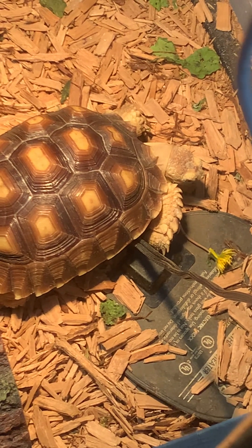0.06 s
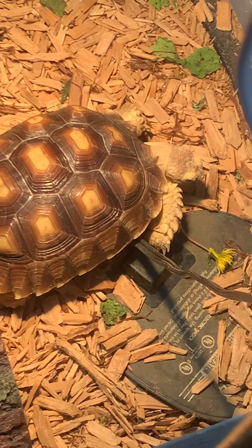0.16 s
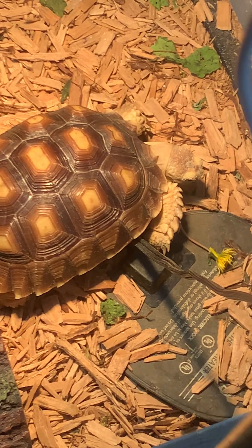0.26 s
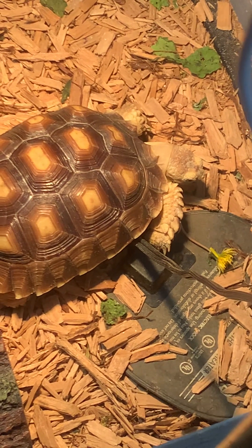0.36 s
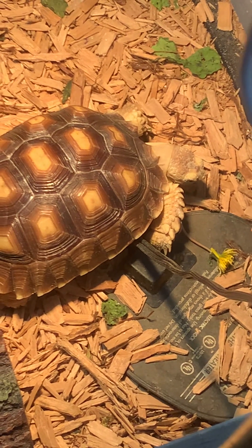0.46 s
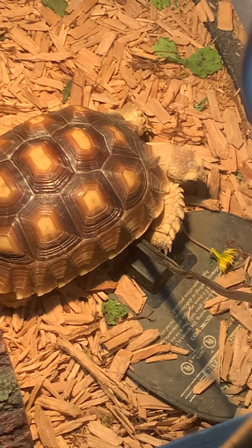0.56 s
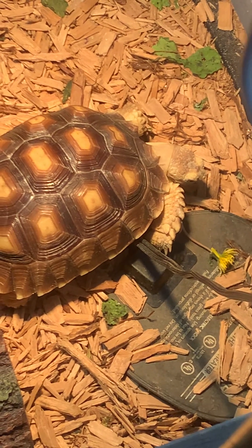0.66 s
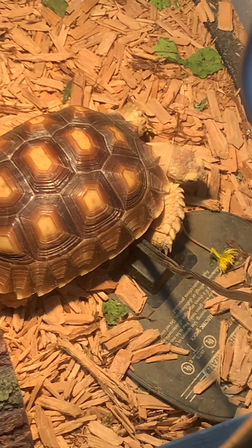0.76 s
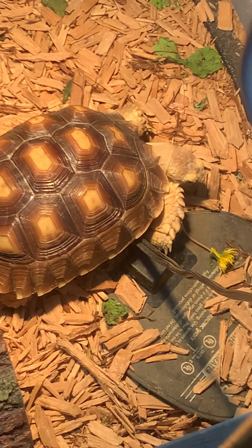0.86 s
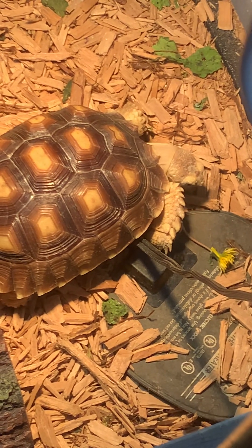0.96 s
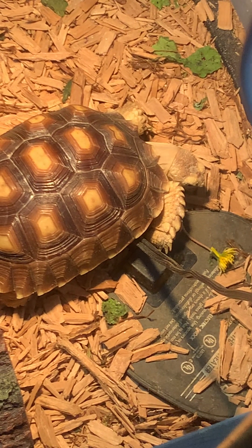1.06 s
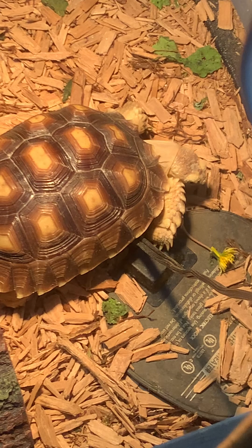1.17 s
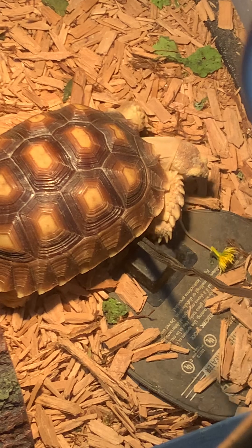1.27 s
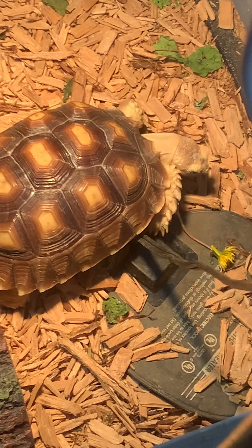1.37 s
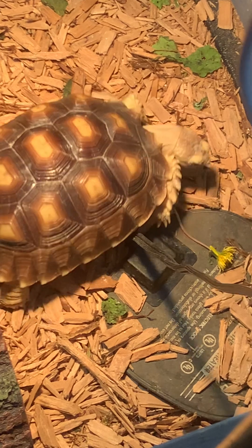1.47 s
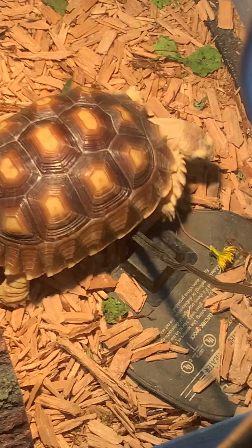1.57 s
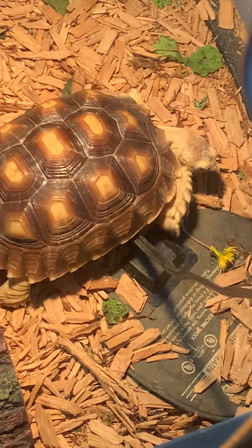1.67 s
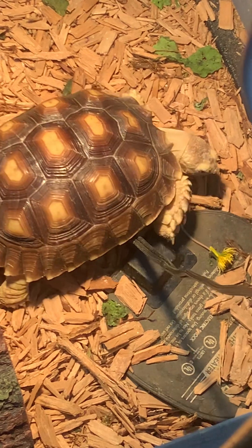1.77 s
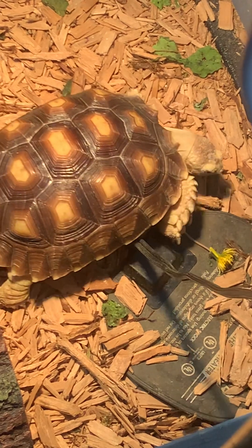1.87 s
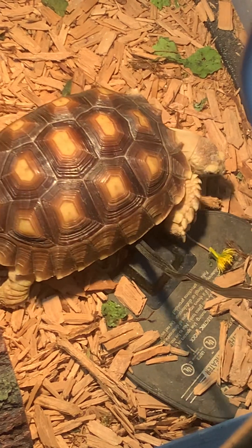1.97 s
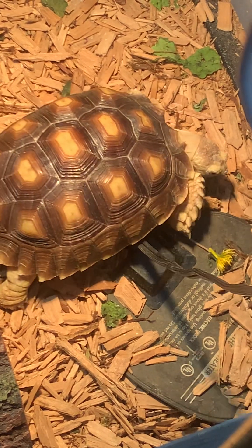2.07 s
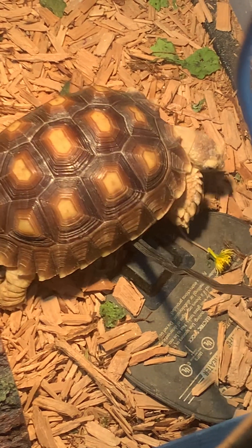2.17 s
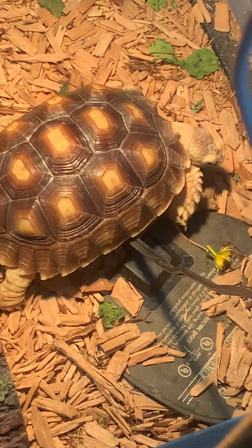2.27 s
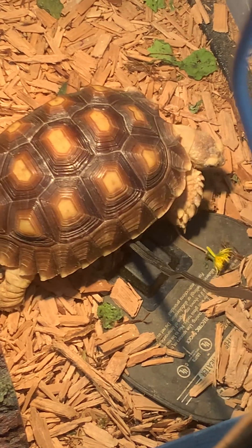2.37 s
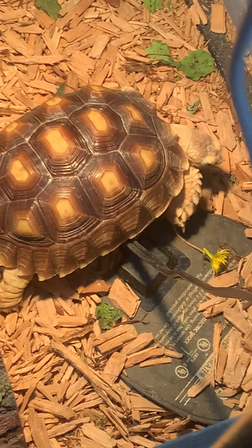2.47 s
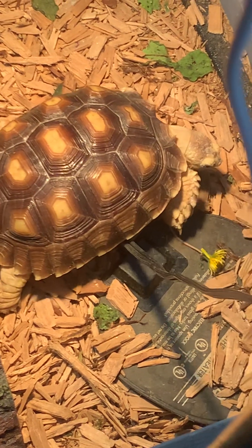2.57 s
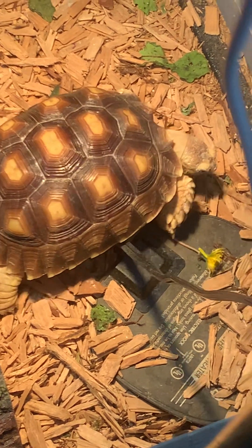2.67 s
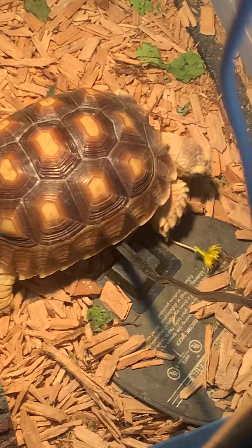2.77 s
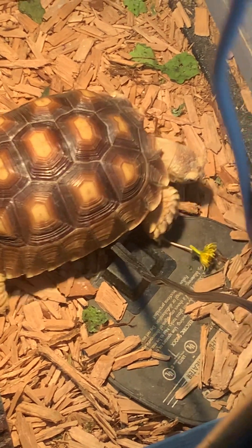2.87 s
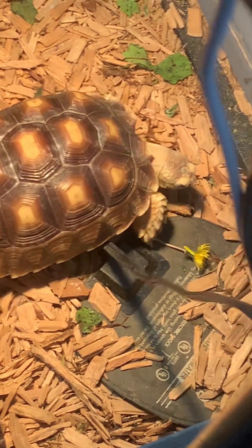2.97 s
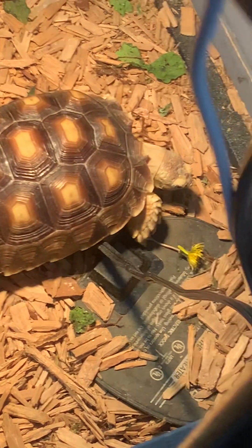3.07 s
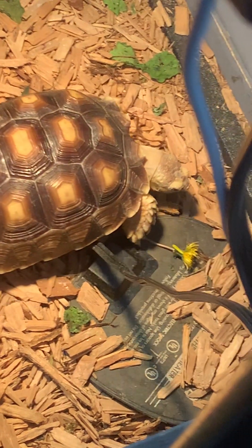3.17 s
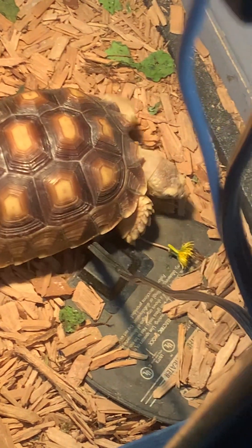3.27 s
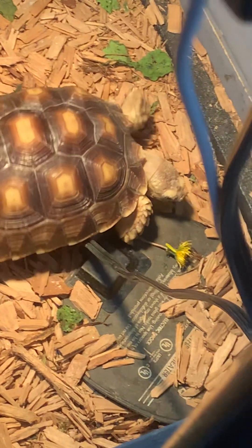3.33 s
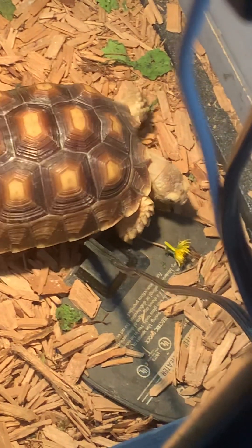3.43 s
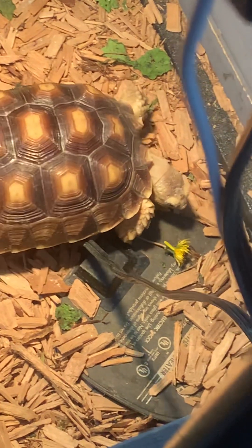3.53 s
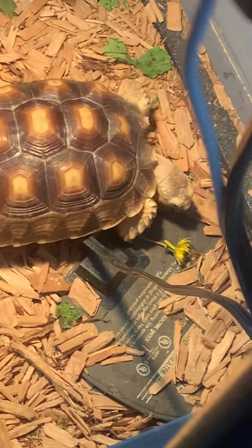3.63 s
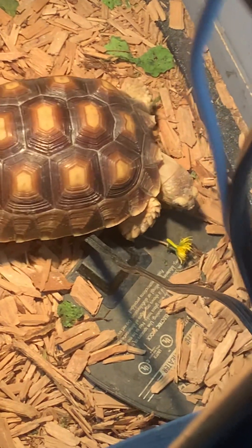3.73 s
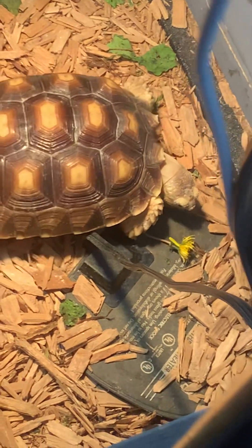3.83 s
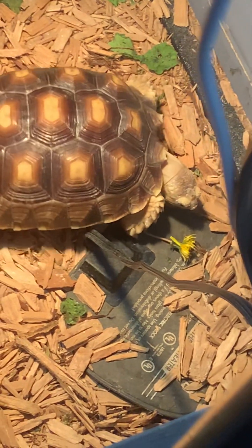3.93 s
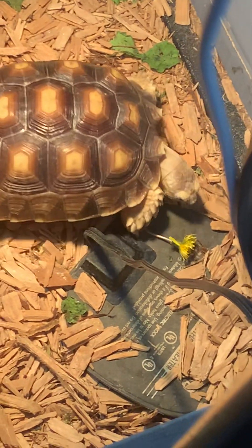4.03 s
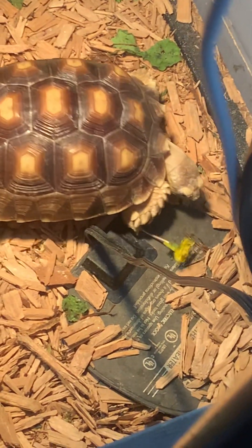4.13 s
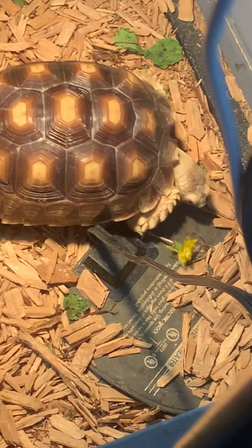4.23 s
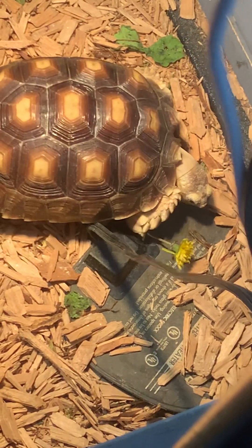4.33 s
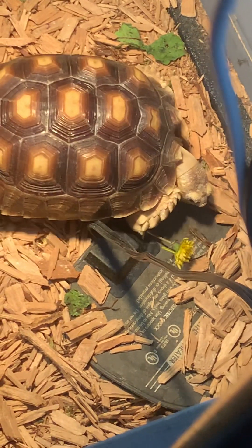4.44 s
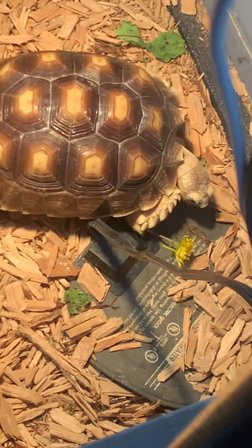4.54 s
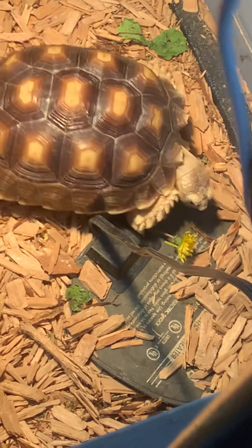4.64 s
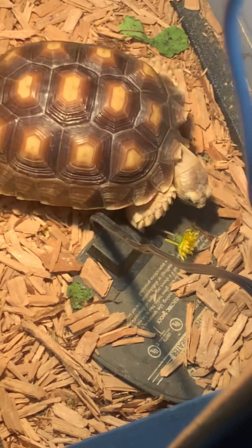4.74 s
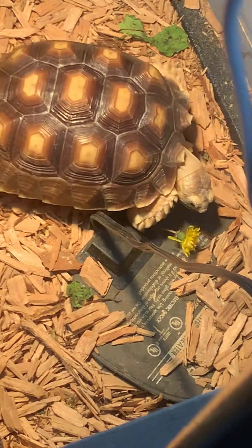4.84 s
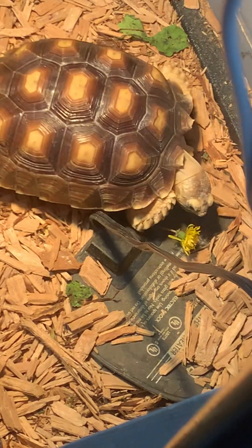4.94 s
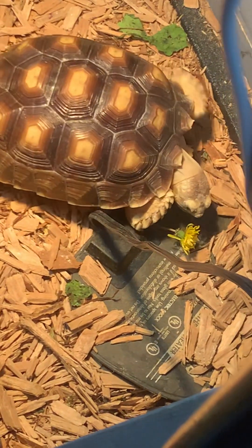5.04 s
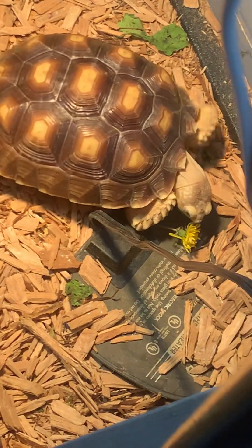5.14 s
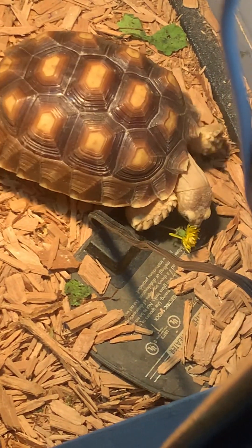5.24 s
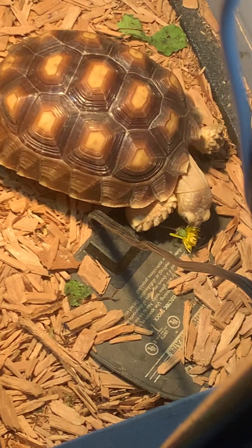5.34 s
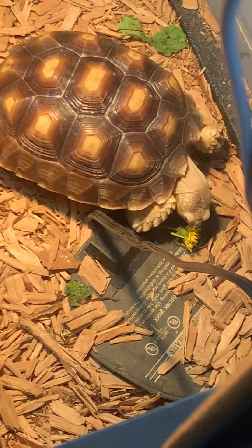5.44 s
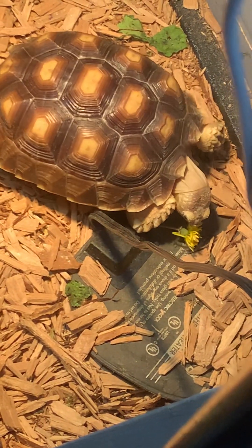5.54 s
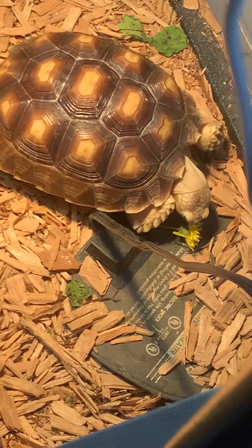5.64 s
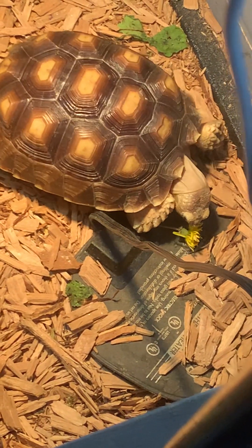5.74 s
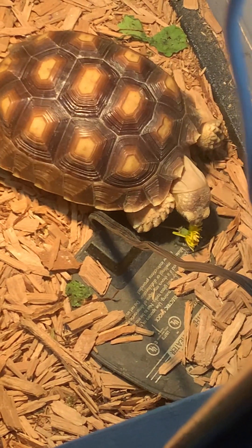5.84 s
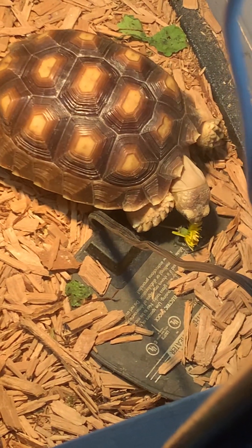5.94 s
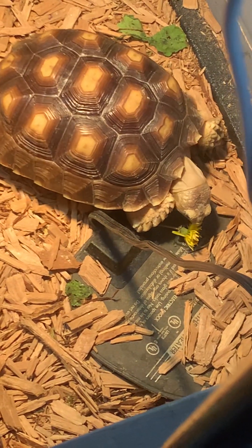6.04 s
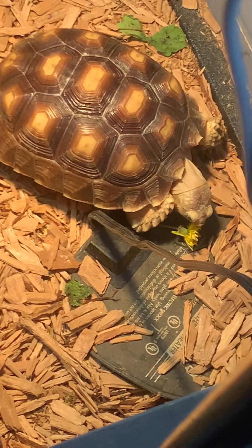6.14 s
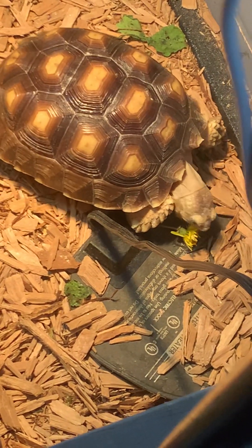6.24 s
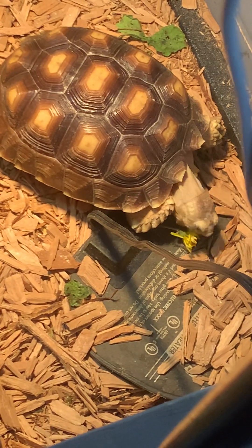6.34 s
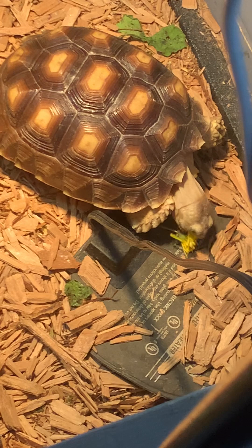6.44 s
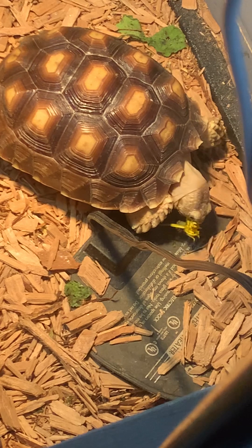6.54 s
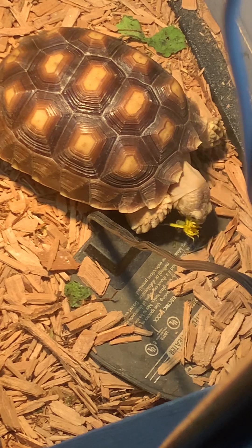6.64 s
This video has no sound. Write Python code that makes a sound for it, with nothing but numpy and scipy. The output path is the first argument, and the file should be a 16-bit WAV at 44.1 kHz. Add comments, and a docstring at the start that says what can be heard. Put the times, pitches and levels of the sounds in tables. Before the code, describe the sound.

A small tortoise shuffles over wood chips with rustles, crunches, sharp snaps and dull bumps, over a steady low indoor hum.

```python
"""A low mains hum and room rumble come first; then a tortoise is heard shuffling over wood chips.
It is indoors in a plastic pen, close to a phone's microphone, and nips a flower.
Dragged chips rustle in tiny noise bursts and crunch under its weight; chips and stalk snap with a
crack and a woody knock. Shell and feet bump the pen floor, which rings low and briefly."""
import sys
import numpy as np
from scipy import signal
from scipy.fft import rfft, irfft, next_fast_len
from scipy.io import wavfile
from scipy.ndimage import uniform_filter1d

SR = 44100
rng = np.random.default_rng(int(sys.argv[2]) if len(sys.argv) > 2 else 0)


def waveform_to_disk(signal):
    """Save audio, clipped to [-1, 1], as 16-bit WAV at the path in sys.argv[1]."""
    frames = np.transpose(np.atleast_2d(signal))
    scaled = np.clip(frames, -1, 1) * 32767
    samples = np.round(scaled).astype(np.int16)
    wavfile.write(sys.argv[1], SR, samples)


N = 295496

# The chip bed from close by: four ranges, and the woody one again under a heavy foot.
# Each row: frequency in Hz, relative level in dB.
WOODY_SPECTRUM = [(400, -33), (620, -19), (710, 4.5), (850, -2.5), (970, 0), (1250, -1), (1600, 0.5),
                  (2200, -4), (3200, -38.5), (5000, -69)]
FIZZ_SPECTRUM = [(1500, -14), (2800, 1.5), (3500, 0), (4500, -0.5), (7000, -2.5), (8800, -6.5),
                 (11000, -47)]
DUST_SPECTRUM = [(7000, -36), (9000, -14.5), (11500, 6), (13000, 3.5), (15000, -16), (16500, -12)]
HOLLOW_SPECTRUM = [(150, -55), (280, -10), (460, 2), (540, -5), (800, -40)]
CRUSH_SPECTRUM = [(350, -23), (600, 1), (850, 8), (1100, 1), (1600, 7), (2200, -5), (3000, -9), (4200, -29),
                  (6000, -36)]
# How the woody, fizzy, dusty and hollow ranges follow the drag.
# Each row: level in dB at a usual drag, share of the drag's change, share of its brightness.
DRAG_RESPONSE = [(-77, 0.96, 0.0), (-83.5, 0.72, .9), (-87.5, .3, .5), (-74, 1.1, -.3)]
def rustle():
    """Chips slip under the tortoise, near the phone; crushing is coarser and fuller than dragging."""
    level, bright = drag_db()
    woody, fizzy, dusty, hollow = [gain_of(db + a * level + b * bright) for db, a, b in DRAG_RESPONSE]
    weight, gritty, thud = crunches()
    coarse = patchy(slips(per_s=1100, spread_db=1.0, t60=0.086), depth_db=3.5)
    fine = patchy(slips(per_s=2000, spread_db=3.7, t60=0.077), depth_db=4.9)
    lumps = patchy(slips(per_s=400, spread_db=2.5, t60=0.03), depth_db=3.3)
    return (woody * coloured(coarse, WOODY_SPECTRUM)
            + weight * coloured(lumps, CRUSH_SPECTRUM)
            + np.hypot(fizzy, gritty) * coloured(fine, FIZZ_SPECTRUM)  # drag and crush add in power
            + np.hypot(dusty, gritty * gain_of(-3.5)) * coloured(fine, DUST_SPECTRUM)
            + np.hypot(hollow, thud) * coloured(coarse, HOLLOW_SPECTRUM))


def slips(per_s, spread_db, t60):
    """Noise in tiny bursts of uneven size, as chips slip past each other."""
    sizes = gain_of(spread_db * np.minimum(rng.exponential(1, N), 5))
    onsets = rng.random(N) < per_s / SR
    decay = gain_of(-60 * np.arange(2000) / SR / t60)
    return signal.oaconvolve(sizes * onsets, decay)[:N] * rng.standard_normal((2, N))


# Legs and shell dragging through the pen. Each row: time in seconds, drag in dB, brightness in dB.
DRAG_PATH = [(0.0, -82.5, -4), (0.39, -87, 3.5), (1.1, -79.5, -2), (1.25, -76, 3), (1.4, -72, 1.5),
             (1.96, -79.5, -1), (2.13, -71, 0), (2.24, -74.5, 4), (2.54, -74, 1), (3.15, -76, 0.5),
             (3.3, -81, 0), (3.45, -79, -2.5), (3.73, -76, 5), (3.9, -71.5, 1.5), (3.96, -75, 7.5),
             (4.09, -78, 0), (4.27, -80, 3), (4.66, -74.5, -2.5), (4.81, -70, 0), (5.19, -72.5, 1),
             (5.34, -79.5, -2), (5.5, -77.5, 0.5), (6.38, -75.5, 3.5), (6.7, -78.5, 1)]
def drag_db(usual_db=-76):
    """Drag level above the usual, and brightness, at every sample."""
    times, level, bright = np.transpose(DRAG_PATH)
    t = np.arange(N) / SR
    return np.interp(t, times, level) - usual_db, np.interp(t, times, bright)


# A foot or the shell crushing into the bedding. Each row: start in seconds, length of the press
# in seconds, then weight, grit and hollow thud in dB.
PRESSES = [(0.643, 0.071, -73.5, -72.5, -97), (1.234, 0.094, -65, -74, -80),
           (1.279, 0.081, -63.5, -84, -58), (1.458, 0.11, -70, -67.5, -82), (1.781, 0.089, -72, -83, -81),
           (2.095, 0.04, -56.5, -69, -50), (2.331, 0.032, -63, -73, -49), (2.452, 0.095, -75, -65.5, -55.5),
           (2.557, 0.16, -68, -71.5, -67), (2.85, 0.052, -65, -65.5, -55), (3.135, 0.15, -90, -74.5, -75),
           (3.297, 0.05, -75, -76, -60.5), (3.337, 0.12, -65, -72.5, -69),
           (3.829, 0.045, -68.5, -77.5, -67), (3.918, 0.14, -66.5, -79, -57.5), (3.976, 0.1, -70, -72, -67),
           (4.289, 0.068, -76, -71.5, -72), (4.617, 0.071, -64.5, -59.5, -55),
           (4.754, 0.044, -82, -72, -56.5), (4.83, 0.058, -70, -64, -59), (5.018, 0.063, -56, -63, -64),
           (5.206, 0.067, -67, -67, -81), (5.259, 0.068, -66, -76, -66), (5.716, 0.047, -73, -79, -82),
           (5.77, 0.11, -75.5, -75.5, -92), (6.096, 0.12, -70, -76, -82), (6.23, 0.042, -88, -83, -71)]
def crunches():
    """Envelopes of weight, grit and thud in each crush: quick rise, sagging hold, softer let-go."""
    out = np.zeros((3, N))
    for start, length, *levels_db in PRESSES:
        progress = np.arange(round(1.6 * length * SR)) / (length * SR)  # the sound outlasts the press
        fall_db = -4 * progress - 29 * np.maximum(progress - .75, 0)
        press = np.minimum(progress / 0.25, 1) * gain_of(fall_db)
        add(out, start, gain_of(levels_db)[:, None] * press)
    return out


# Chips and stalk snapping at close range. Each row: start in seconds, knock level in dB, knock pitch
# in Hz, crack level in dB, crack brightness (positive gives a high hissy tick, negative a duller
# mid crack), factor on the knock's decay time.
SNAP_EVENTS = [(1.229, -46, 860, -53, 5, 1.6), (1.248, -39, 1000, -45, 5.5, 1.2),
               (1.297, -44.5, 853, -48, 5, 3.4), (1.3, -47, 725, -48, -31, 2.4),
               (1.319, -45, 750, -38, 5, 2.4), (1.382, -50.5, 896, -66, -14, 2),
               (1.436, -66, 800, -67, 12, 1.1), (1.481, -52.5, 1093, -59, -34, 4.2),
               (1.51, -52, 1000, -56, -2, 1.5), (2.092, -29, 970, -56, 3, 1.01),
               (2.334, -46.5, 930, -53, 7, 2.3), (2.431, -68, 830, -56, 5, 1), (2.467, -48, 820, -72, 9, 6),
               (2.488, -46.5, 710, -50.5, 3, 4), (2.555, -72, 1110, -56.5, 4, 0.91),
               (2.861, -54.5, 1430, -58, -9, 2.2), (2.972, -43, 1110, -94, 4, 0.62),
               (3.305, -56.5, 1380, -55.5, 1, 1.3), (3.38, -42.5, 1420, -73, 2, 0.8),
               (3.439, -57, 1060, -86, -2, 1.5), (3.826, -63, 710, -61, -12, 1.1),
               (3.918, -54, 1500, -85, 0.0, 1.5), (3.939, -42, 1400, -79, 4, 0.68),
               (3.966, -42, 1370, -54, 1, 1.3), (3.993, -53.5, 840, -56, -2, 6.6),
               (4.108, -52.5, 1350, -65, 2, 0.94), (4.244, -55, 710, -65, -22, 1.5),
               (4.297, -62, 1290, -59, -22, 4), (4.611, -46, 1240, -57, 3, 2.4),
               (4.634, -47.5, 1098, -56, -16, 5.8), (4.745, -51, 745, -60, 2, 2.6),
               (4.765, -43, 890, -54, -28, 2.4), (4.83, -53, 900, -51.5, -1.5, 5.8),
               (4.973, -51, 846, -62, -20, 1.8), (5.013, -50, 776, -85, 0.0, 2.7),
               (5.029, -37, 886, -53, 7, 3.3), (5.098, -48, 650, -79, -5, 1.5),
               (5.24, -50, 1325, -52.5, 1, 2.1), (5.274, -46.5, 987, -56, 1, 2.8),
               (5.333, -48, 714, -86, 0.0, 2.8), (5.719, -47.5, 975, -55.5, 4, 0.67),
               (5.9, -61, 1400, -61, -1, 1.1), (5.944, -54.5, 1520, -58.5, 1.5, 1.1),
               (6.018, -57, 730, -62, 7, 1.5), (6.116, -58, 1030, -60, -1, 1.6),
               (6.171, -71, 870, -60.5, -3, 0.99), (6.229, -72, 1080, -53, 5.5, 0.91),
               (6.492, -55.5, 1450, -61, -1, 1.1), (6.536, -74, 710, -60, -1, 1.1)]
# A chip's modes. Each row: multiple of the knock pitch, relative level in dB, base t60 in seconds.
CHIP_MODES = [(1., -7, .024), (.62, -16, .025), (1.45, -14, .016), (2.3, -21, .012)]
# The rough part of the knock. Each row: multiple of the knock pitch, relative level in dB.
SPLINTER_SPECTRUM = [(.3, -30), (.7, -4), (1.1, 0), (1.7, -5), (3.2, -16), (7, -40)]
def snaps(crack_t60=0.018, splinter_t60=0.023, scatter_t60=0.22):
    """A noisy crack and a short rough knock of the chip, with faint scatter from the pen walls."""
    out, t = np.zeros((2, N)), np.arange(4096) / SR
    attack = np.minimum(t / 0.0019, 1)
    for start, knock_db, hz, crack_db, bright, stretch in SNAP_EVENTS + ticks():
        detunes, phases = rng.uniform(0.92, 1.04, (4, 1)), rng.random((4, 2, 1))
        noise = rng.standard_normal((2, len(t)))
        knock = sum(gain_of(db - 60 * t / (t60 * stretch)) * sine(hz * ratio * detune * t + phase)
                    for (ratio, db, t60), detune, phase in zip(CHIP_MODES, detunes, phases))
        splinter = coloured(noise, [(ratio * hz, db) for ratio, db in SPLINTER_SPECTRUM])
        knock += gain_of(-12 - 60 * t / (splinter_t60 * stretch)) * splinter
        crack_spectrum = [(1200, -33), (2500, -2 * bright), (10000, 3), (13500, 2.7 * bright),
                          (15000, -1), (17000, -20)]
        scatter = gain_of(-27 - 60 * t / scatter_t60)
        crack = coloured(noise, crack_spectrum) * (gain_of(-60 * t / crack_t60) + scatter)
        add(out, start, (gain_of(knock_db) * knock + gain_of(crack_db) * crack) * attack)
    return out


def ticks(count=30, usual_db=-62, spread_db=5, low_hz=690, high_hz=1550):
    """Snap rows for chips tipping over faintly at random moments, louder where the drag is strong."""
    when, size, pitch = rng.random((count, 3)).T
    drag = drag_db()[0][(when * N).astype(int)]
    levels = usual_db + drag + spread_db * (2 * size - 1)
    pitches = low_hz * (high_hz / low_hz) ** pitch
    return [(start, db, hz, db - 19, 0, 1.5) for start, db, hz in zip(when * N / SR, levels, pitches)]


# Shell and feet bumping the pen floor, near the phone. Each row: start in seconds, level in dB,
# strongest frequency in Hz, factor on the decay time.
FLOOR_BLOWS = [(1.297, -34, 160, 0.45), (1.32, -36, 127, 0.98), (2.097, -27.5, 192, 0.55),
               (2.333, -37.5, 192, 0.51), (2.465, -46, 209, 2.3), (2.49, -50, 405, 0.63),
               (2.86, -42, 142, 0.83), (3.965, -37, 136, 1.07), (4.001, -37.5, 350, 0.53),
               (4.619, -45, 189, 1.9), (4.649, -49, 400, 1), (4.767, -34, 213, 0.68),
               (5.032, -38, 253, 0.7), (5.05, -38, 270, 0.51), (5.279, -36.5, 258, 0.43)]
# The plastic floor's modes. Each row: frequency in Hz, base t60 in seconds.
FLOOR_MODES = [(125, 0.22), (150, 0.11), (185, 0.14), (215, 0.084), (260, 0.19), (310, 0.064), (370, 0.091),
               (460, 0.17)]
def bumps(spread_octaves=0.57):
    """The place of the blow decides which modes of the plastic floor answer."""
    out, t = np.zeros((2, N)), np.arange(8192) / SR
    attack = 1 - np.exp(-t / 0.0033)
    for start, db, centre_hz, stretch in FLOOR_BLOWS:
        phases = rng.uniform(-0.16, 0.3, (len(FLOOR_MODES), 2, 1))
        ring = 0
        for (hz, t60), phase in zip(FLOOR_MODES, phases):
            mode_db = -6 * (np.log2(hz / centre_hz) / spread_octaves) ** 2
            ring += gain_of(mode_db - 60 * t / (t60 * stretch)) * sine(hz * t + phase)
        add(out, start, gain_of(db) * ring * attack)
    return out


# Thin scrapes in the pen. Each row: start and length in seconds, pitch and width in Hz, level in dB.
THIN_SCRAPES = [(0.656, 0.2, 4610, 1000, -72.5), (1.797, 0.048, 6800, 500, -74),
                (2.16, 0.084, 6170, 450, -73), (2.345, 0.025, 7340, 550, -64.5),
                (4.337, 0.17, 1790, 340, -74.5), (4.461, .04, 6460, 600, -76.5),
                (6.054, 0.2, 3660, 1100, -72.5), (6.332, 0.12, 1546, 300, -70),
                (6.484, 0.11, 8840, 1000, -73.5)]
def squeaks():
    """Each scrape is a narrow noise that starts quickly and fades."""
    out = np.zeros((2, N))
    for start, length, hz, width, db in THIN_SCRAPES:
        progress = np.arange(round(length * SR)) / (length * SR)
        envelope = np.minimum(progress / 0.068, 1) * (1 - progress)
        add(out, start, gain_of(db) * narrow_noise(hz, width, len(progress)) * envelope)
    return out


MAINS_STEADY = .9  # steady share of the power in most hum lines
# Low drones in the room around the pen: the room's own resonances at 58 and 77 Hz, mains and a fan above. #
# Each row: frequency in Hz, rms level in dB, width of the wavering in Hz, steady share from 0 to 1.
HUM_LINES = [(58.3, -51, 4.9, MAINS_STEADY), (77.34, -52, 6.8, 0.98), (120.66, -48.5, 13.8, MAINS_STEADY),
             (239, -57.5, 3.5, MAINS_STEADY), (256.3, -69, 1.2, MAINS_STEADY), (305, -68.5, 3, 0.49)]
def hum():
    """Room resonances, mains and fan drone in lines that are part steady tone, part wavering band."""
    out, t = np.zeros((2, N)), np.arange(N) / SR
    for hz, db, width, steady in HUM_LINES:
        tone = np.sqrt(2) * sine(hz * t + rng.random((2, 1)))
        waver = narrow_noise(hz, width, N)
        out += gain_of(db) * (np.sqrt(steady) * tone + np.sqrt(1 - steady) * waver)
    return out


# Room tone where the phone stands. Each row: frequency in Hz, relative level in dB.
ROOM_SPECTRUM = [(18, -24.5), (40, -4), (60, -1), (140, -6.5), (200, -15.5), (320, -12.5), (400, -32.5),
                 (620, -41), (1000, -50.5), (1700, -47), (2500, -56.5), (5000, -53.5), (13000, -61),
                 (14500, -47.5), (16000, -75.5)]
def room(level_db=-51):
    """Rumble of the house over microphone hiss, a little uneven."""
    noise = patchy(rng.standard_normal((2, N)), depth_db=3.36, size=2048)
    return gain_of(level_db) * coloured(noise, ROOM_SPECTRUM)


def gain_of(db):
    return 10 ** (np.asarray(db) / 20)


def sine(cycles):
    return np.sin(2 * np.pi * cycles)


def unit_rms(x):
    return x / np.sqrt(np.mean(x ** 2) + 1e-20)


def curve_at(points, hz):
    knots_hz, values = np.transpose(points)
    return np.interp(np.log(hz + 1), np.log(knots_hz + 1), values)


def add(mix, start, sound):
    part = mix[:, round(start * SR):][:, :sound.shape[1]]
    part += sound[:, :part.shape[1]]


def coloured(x, spectrum):
    """Shapes the spectrum and sets rms 1."""
    size = next_fast_len(x.shape[-1])
    gains = gain_of(curve_at(spectrum, np.fft.rfftfreq(size, 1 / SR)))
    return unit_rms(irfft(rfft(x, size) * gains, size)[:, :x.shape[-1]])


def narrow_noise(hz, width, size):
    """Two noises in a narrow band: a slowly wandering complex amplitude on a carrier."""
    real, imag = rng.standard_normal((2, 2, size + SR))
    lowpass = [1], [1, -np.exp(-np.pi * width / SR)]
    wander = signal.lfilter(*lowpass, signal.lfilter(*lowpass, real + 1j * imag))[:, SR:]
    carrier = np.exp(2j * np.pi * hz * np.arange(size) / SR)
    return unit_rms((wander * carrier).real)


def patchy(x, depth_db, size=512):
    """Lifts and dips random patches of the spectrum, as when different chips take part."""
    frames = signal.stft(x, nperseg=size)[2]
    patches = uniform_filter1d(rng.standard_normal(frames.shape[1:]), size=2, axis=0)
    patches = unit_rms(uniform_filter1d(patches, size=8, axis=1))
    return unit_rms(signal.istft(frames * gain_of(depth_db * patches), nperseg=size)[1][:, :N])


def scene():
    """Room and tortoise as they reach the phone, in two arrivals of every source."""
    return hum() + room() + rustle() + snaps() + bumps() + squeaks()


# The stereo image. Each row: frequency in Hz, left-right likeness from 0 to 1.
STEREO_LIKENESS = [(60, .99), (130, .99), (250, .93), (320, .55), (500, .4), (800, .55), (1600, .68),
                   (2350, .1), (2850, .4), (3300, .25), (5000, .7), (6050, .75), (6500, .98), (7300, .99),
                   (7900, .7), (9700, .98), (10800, .84), (12300, .995), (13500, .83), (14600, .97)]
# Each row: frequency in Hz, how far the left channel leads the right in radians.
STEREO_LEAD = [(0, 0), (43, -.26), (86, -.34), (130, -.65), (180, -.75), (240, -1.4), (700, -4.5),
               (950, -5.7), (1460, -6.6), (2000, -5.4), (2900, -4.7), (3600, -3.3), (4200, -3.7),
               (5000, -3.0), (6450, 0), (7350, 0), (9500, 3), (9900, 3.2), (12050, 6.2), (12550, 6.3),
               (14600, 9.4)]
# Each row: frequency in Hz, left level minus right in dB.
STEREO_BALANCE = [(50, -3.5), (130, 0.8), (250, -0.6), (700, -0.5), (2000, -2.5), (6000, 0)]
def record(dry, cutoff_hz=14300):
    """Both channels share the first arrival, the right blends in the second; the top treble is cut."""
    size = next_fast_len(N + SR)
    first, second = rfft(dry, size)
    hz = np.fft.rfftfreq(size, 1 / SR)
    likeness = np.clip(curve_at(STEREO_LIKENESS, hz), 0, 1)
    half_lead = np.exp(.5j * np.interp(hz, *np.transpose(STEREO_LEAD)))
    half_balance = gain_of(curve_at(STEREO_BALANCE, hz) / 2)
    left = first * half_lead * half_balance
    right = (likeness * first + np.sqrt(1 - likeness ** 2) * second) / (half_lead * half_balance)
    pair = irfft(np.array([left, right]), size)[:, :N]
    lowpass = signal.firwin(511, cutoff_hz, window=("kaiser", 9), fs=SR)
    return signal.oaconvolve(pair, lowpass[None], "same")


dry = scene()
out = record(dry)
waveform_to_disk(out)
```